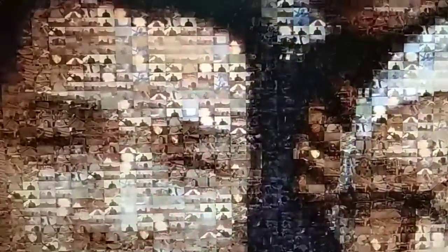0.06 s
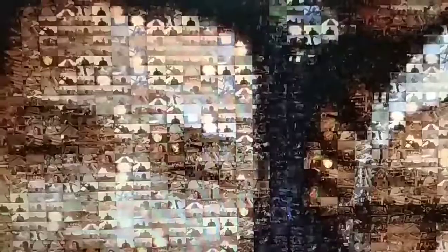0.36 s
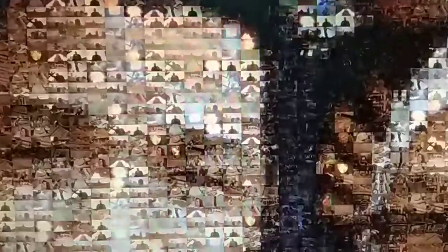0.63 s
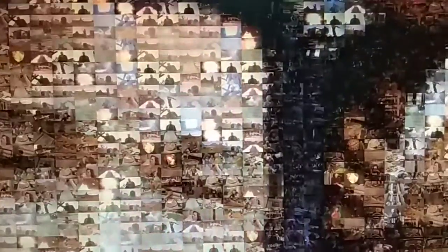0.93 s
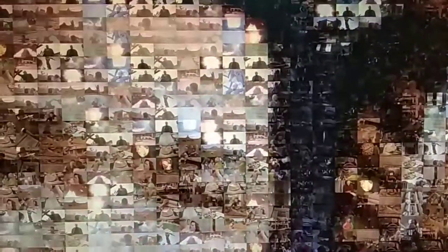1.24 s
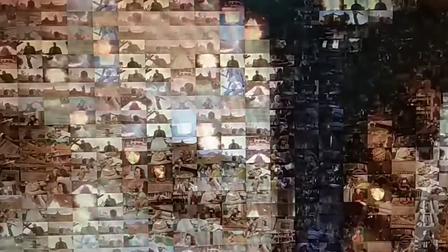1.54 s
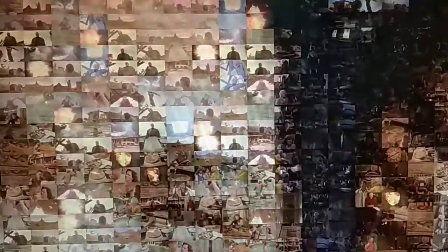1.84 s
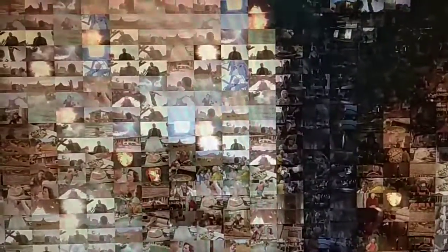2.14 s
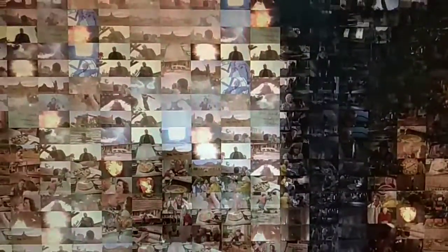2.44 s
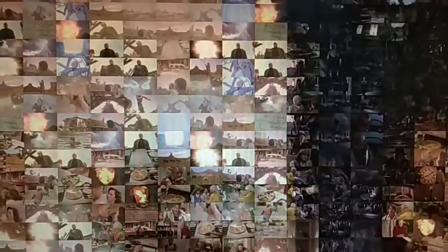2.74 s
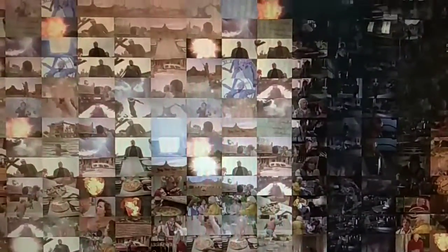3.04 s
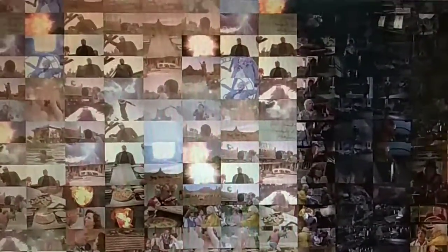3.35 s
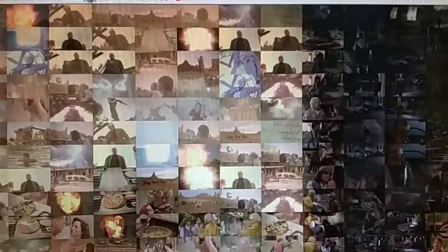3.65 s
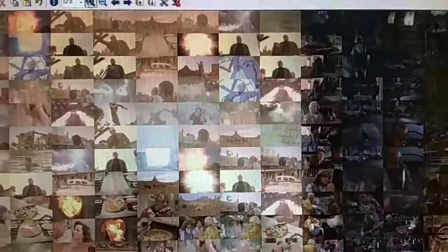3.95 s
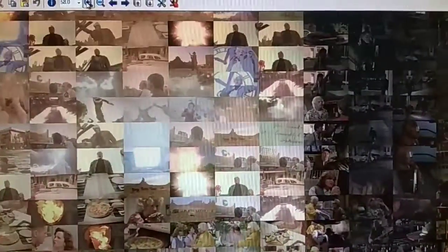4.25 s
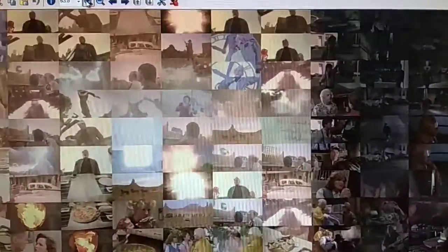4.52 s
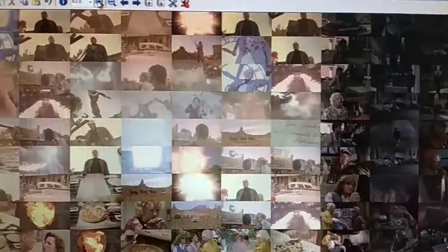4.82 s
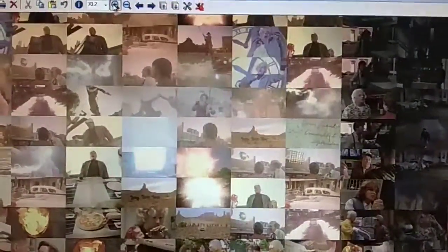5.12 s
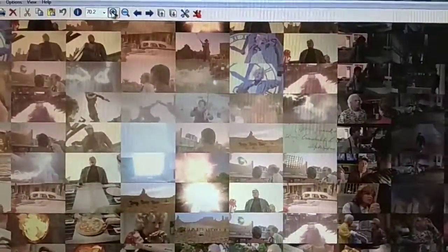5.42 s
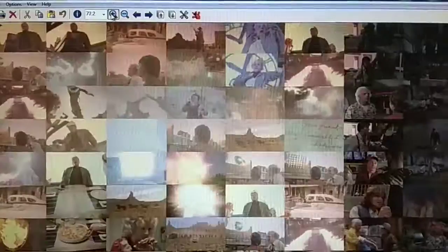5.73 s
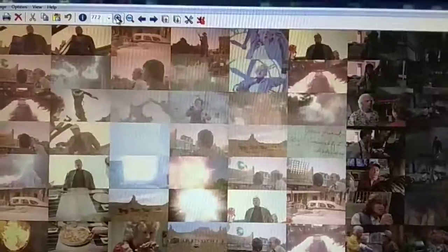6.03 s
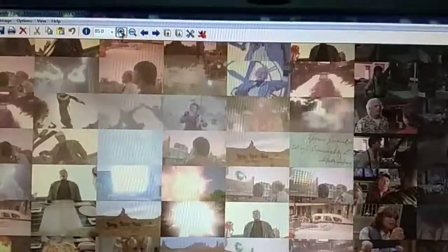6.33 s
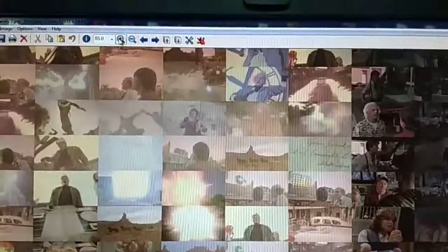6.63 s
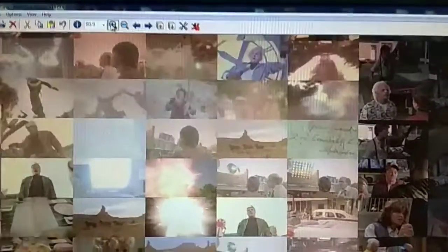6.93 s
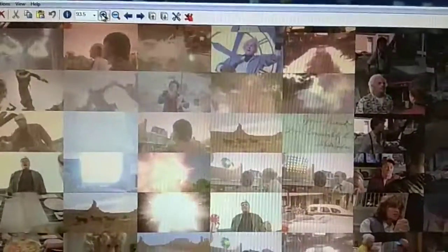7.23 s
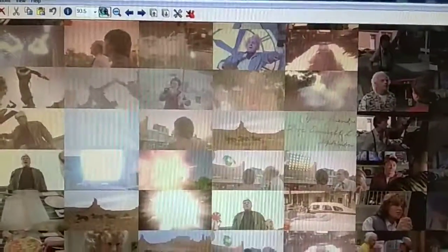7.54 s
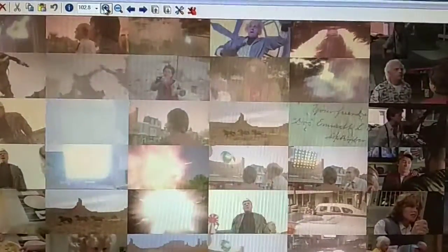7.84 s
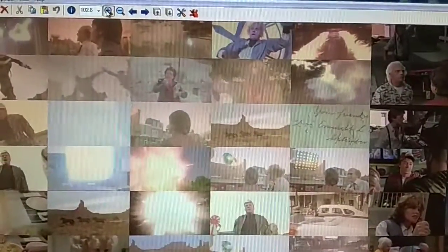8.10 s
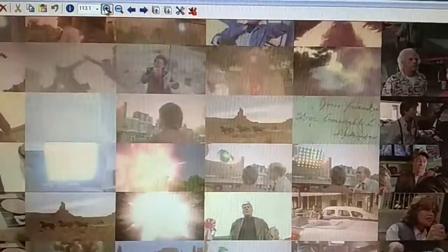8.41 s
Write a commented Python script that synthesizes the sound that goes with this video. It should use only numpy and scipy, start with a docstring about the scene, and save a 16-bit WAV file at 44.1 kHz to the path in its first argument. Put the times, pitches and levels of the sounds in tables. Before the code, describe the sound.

A mouse scroll wheel clicks notch by notch, gradually slowing, over a low draught rumble on the microphone and a steady computer hum.

```python
"""At a desk in a small room, a mouse wheel is turned notch by notch close to a hand-held microphone.
Each notch snaps a spring against the plastic shell, whose modes ring and echo in the room.
A draught buffets the right microphone port: its turbulent pressure makes a low, lumpy rumble.
Behind them a computer hums, whirs and buzzes faintly, with soft chirps just above the microphone's hiss."""
import sys
import numpy as np
from scipy import signal
from scipy.fft import rfft, irfft, next_fast_len
from scipy.io import wavfile
from scipy.ndimage import uniform_filter1d

SR = 44100
rng = np.random.default_rng(int(sys.argv[2]) if len(sys.argv) > 2 else 0)


def materialize(psi):
    """Save the field psi as 16-bit PCM at rate SR to the path in sys.argv[1].

    A 1-D psi becomes a single channel; in a 2-D psi each row is a channel.
    """
    bounded = np.clip(np.atleast_2d(psi).T, -1, 1)
    quanta = np.round(bounded * 32767).astype(np.int16)
    wavfile.write(sys.argv[1], SR, quanta)


N = 377919


def wheel(direct_db=1.07, echo_db=-6.0):
    """Repeated impacts: soft and hard notches alternate, each kind rebounding much alike every time."""
    # wheel notches: (time [s], relative level [dB], extra treble [dB], extra body [dB],
    # rattle decay time at 11 kHz [s])
    notches = [(0.1118, -47.5, 3, 2, 0.0026), (0.2744, -48, 0, 1.5, 0.0023),
               (0.431, -46.5, 2, -2.0, 0.0023), (0.6041, -48, 0.0, 0, 0.002), (0.7517, -48, 6.5, 2, 0.0021),
               (0.9282, -47.5, 1, -0.5, 0.0019), (1.0786, -48.5, 4, 3, 0.003), (1.2683, -48, 0, 1, 0.0023),
               (1.4279, -47.0, 2, 1.0, 0.0034), (1.5963, -48.5, 1, 0, 0.0022),
               (1.7508, -48.5, 4, 3, 0.0024), (1.9566, -48.5, 2, 1, 0.0021),
               (2.0999, -47.5, 2, -1.5, 0.0021), (2.3216, -48.5, 1, 0.5, 0.0017),
               (2.4776, -48, 3, -1, 0.0024), (2.6683, -48.5, 1, 0.0, 0.0015),
               (2.8209, -47.5, 0.0, 3.5, 0.0021), (3.0079, -48, 0.5, 2.0, 0.0018),
               (3.1823, -47, 2, -1.0, 0.0025), (3.4165, -49, 2, 1, 0.0014), (3.5743, -48.5, 3, 1, 0.0027),
               (3.7958, -48.5, 2, 3, 0.0023), (3.9747, -48.5, 2, 0, 0.0028),
               (4.2876, -47.5, 0.5, -0.5, 0.0028), (4.4745, -48.0, 1.0, 4.5, 0.0022),
               (4.821, -48, 4, -1.0, 0.002), (5.0246, -48, 3, 1, 0.0027), (5.4405, -48.5, 2, 2, 0.0022),
               (5.6433, -48.5, 6, 1, 0.0016), (6.0637, -49.5, 4, 1.5, 0.0024), (6.2505, -48, 3, 4, 0.002),
               (6.6832, -48.0, 1.0, 2, 0.001), (6.8683, -48, 2, 0, 0.002), (7.319, -48.0, 1.5, 0.5, 0.0018),
               (7.5055, -47.5, 1.0, 0.5, 0.0017), (8.0318, -48, 1.5, 2, 0.0019),
               (8.2521, -48, 4, -2, 0.0024)]
    # modes of wheel and shell: (frequency [Hz], bandwidth [Hz], then relative levels:
    # soft notch left [dB], soft notch right [dB], hard notch left [dB], hard notch right [dB])
    modes = [(2400, 400, -38.5, -30.0, -32.0, -30.0), (2900, 250, -21.0, -29.5, -24.0, -31.5),
             (3400, 400, -26.5, -26.5, -26.5, -30.0), (5000, 700, -38.5, -34.5, -22.0, -24.0),
             (6050, 500, -23.0, -21.5, -29.5, -26.0), (7150, 300, -15.5, -20.0, -25.0, -32.0),
             (7620, 220, -10.8, -18.5, -17.3, -22.0), (8200, 260, -14.0, -16.0, -22.5, -23.5),
             (9350, 240, -22.5, -24.5, -14.0, -17.5), (9950, 220, -14.5, -25.5, -14.5, -35.0),
             (10400, 300, -11.5, -20.0, -16.5, -25.5), (11130, 220, -10.0, -20.0, -14.5, -18.0),
             (11530, 200, -13.0, -14.5, -9.0, -15.0), (12600, 260, -7.5, -17.5, -11.5, -22.5),
             (13380, 220, -18.5, -18.0, -41.5, -20.0), (13800, 200, -29.5, -23.5, -12.5, -21.5),
             (14550, 200, -9.0, -21.0, -7.0, -18.0), (14970, 200, -17.5, -27.0, -9.0, -19.5),
             (15560, 200, -19.5, -27.0, -21.0, -26.0)]
    rebound_patterns = rng.standard_normal((2, len(modes), 2, 1024))   # kind, mode, port, sample
    reflection_patterns = rng.standard_normal((2, 2, 16384))   # kind, port, sample
    out = np.zeros((2, N))
    for k, (time_s, db, treble_db, body_db, rattle_s) in enumerate(notches):
        hard = k % 2
        rebounds = varied(rebound_patterns[hard], fresh_share=0.4)
        click = spring_snap(modes, rebounds, hard, treble_db, body_db, rattle_s)
        add(out, time_s, click * from_db(db + direct_db))
        reflections = bunched(varied(reflection_patterns[hard], fresh_share=0.8))
        add(out, time_s, room_echo(reflections) * from_db(db + echo_db))
    return out


def spring_snap(modes, rebounds, hard, treble_db, body_db, rattle_s, rise_s=0.0002, impact=2.7):
    """Modal ringing: the spring's impact and rattle drive the shell, which radiates unevenly."""
    t = np.arange(rebounds.shape[-1]) / SR
    out = np.zeros(rebounds.shape[1:])
    top_db = treble_db + (-0.5 if hard else -2.5)
    for k, (hz, width_hz, *levels_db) in enumerate(modes):
        # the rebounds get softer, so they stop driving the high modes first
        decay = np.exp(-t / rattle_s * np.sqrt(hz / 11000))
        force = rebounds[k] * (1 - np.exp(-t / rise_s)) * decay
        force[:, round(rise_s * SR)] += impact * (-1) ** k
        # the finger's grip shifts each mode a little in pitch and level
        detune, grip_db = rng.normal(0, 0.005), rng.normal(0, 1.0)
        ringing = resonance(force, hz * (1 + detune), width_hz)
        ports_db = np.reshape(levels_db, (2, 2, 1))[hard]
        colour_db = (body_db - 0.1) * (hz < 6500) + top_db * (hz > 12000)
        out += from_db(ports_db + colour_db + grip_db) * ringing / ringing.std(axis=1, keepdims=True)
    return out


def room_echo(reflections, room_t60_s=0.35, air_hz=12000, air_t60_s=0.24):
    """Reverberation: early reflections from desk and screen, and a diffuse tail whose top dies first."""
    # spectrum of the echo: (frequency [Hz], relative level [dB])
    spectrum = [(700, 2.5), (1500, -6), (2200, -10), (2900, 0), (4200, -9), (6000, -8.5), (8000, 0),
                (9200, -5), (11500, 6), (13000, 0), (14500, 3), (15300, -1), (16200, -22)]
    t = np.arange(reflections.shape[-1]) / SR
    decay = from_db(-60 * t / room_t60_s) * (t > 0.002)
    early_cluster = 0.32 * bell(t - 0.014, width_s=0.0025)
    tail = coloured(reflections, spectrum)
    dull = signal.sosfiltfilt(signal.butter(4, air_hz, fs=SR, output="sos"), tail)
    top = (tail - dull) * from_db(-60 * t / air_t60_s)
    return (dull + top) * (decay + early_cluster)


def bunched(reflections, spacing_s=0.003, spread_db=2.5):
    """Amplitude modulation: reflections arrive in stronger and weaker bunches."""
    t = np.arange(reflections.shape[-1]) / SR
    knots = np.arange(0, t[-1], spacing_s)
    return reflections * from_db(np.interp(t, knots, rng.normal(0, spread_db, len(knots))))


def draught():
    """Turbulent pressure: slow swirls and fast eddies on the right port, soft swirl on the sheltered left."""
    # light breeze on the right port: (time [s], relative level [dB])
    breeze = [(0.0, -42), (0.85, -47), (1.2, -34), (1.7, -36.5), (2.1, -40), (2.75, -43), (3.3, -40),
              (4.9, -40), (5.65, -41), (5.85, -58), (6.25, -40), (6.45, -58), (6.9, -52.5), (7.1, -41),
              (7.35, -57), (7.72, -65), (8.15, -53), (8.57, -39)]
    # gusts on the right port: (start [s], hold [s], relative swirl level [dB], relative eddy level [dB])
    gusts = [(0.061, 0.089, -29.5, -46), (0.507, 0.069, -30, -47.5), (0.651, 0.014, -30, -43.5),
             (0.984, 0.072, -30, -42.5), (1.114, 0.039, -27, -45.5), (1.182, 0.11, -30.5, -45),
             (1.425, 0.046, -26.5, -47), (1.603, 0.04, -34, -50), (1.784, 0.038, -33, -43.5),
             (1.897, 0.085, -30, -42.5), (2.159, 0.028, -30.5, -48.5), (2.233, 0.097, -34.5, -52.5),
             (2.521, 0.052, -26.5, -49), (2.887, 0.055, -35, -51), (2.957, 0.17, -30.5, -51),
             (3.314, 0.11, -29.5, -46.5), (3.557, 0.026, -30.5, -43), (3.723, 0.014, -27, -47),
             (3.814, 0.11, -35, -53), (4.037, 0.11, -34.5, -51), (4.268, 0.015, -32, -54),
             (4.397, 0.078, -35, -56.5), (4.548, 0.014, -31.5, -48.5), (4.663, 0.24, -31, -50.5),
             (5.103, 0.066, -33.5, -51.5), (5.235, 0.025, -32.5, -67), (5.478, 0.017, -27, -61),
             (5.565, 0.11, -36.5, -66), (5.98, 0.056, -38, -58), (6.118, 0.083, -37.5, -55.5),
             (7.023, 0.021, -29, -52), (7.12, 0.11, -40, -73), (7.47, 0.12, -39, -75),
             (7.99, 0.091, -42, -82), (8.242, 0.013, -40.5, -76), (8.455, 0.099, -38, -58)]
    # swirl on the left port: (time [s], relative level [dB])
    sheltered = [(0, -47), (0.45, -40), (1.1, -42), (1.55, -44), (1.95, -45), (2.9, -44.5), (3.7, -49),
                 (3.91, -28.5), (4.04, -58), (4.25, -37), (4.5, -62), (4.85, -61), (5.1, -43),
                 (5.55, -35.5), (5.95, -51), (8.57, -53)]
    # spectra of right swirl, right eddies and left swirl: (frequency [Hz], relative level [dB])
    swirl_spectrum = [(10, -6.5), (25, 3), (45, 1.5), (70, -3.5), (100, -9.5), (140, -26.5), (250, -47.5)]
    eddy_spectrum = [(40, -8), (80, -4.5), (120, 6), (170, 4), (230, -5), (320, -15.5), (480, -28.5),
                     (900, -36), (1600, -41.5)]
    left_spectrum = [(4, -2), (12, 1), (28, -2.5), (48, -4), (80, -16), (200, -42)]
    t = np.arange(N) / SR
    breeze_db = np.interp(t, *np.transpose(breeze))
    swirl_gain, eddy_gain = from_db(breeze_db + 4.5), from_db(breeze_db - 19)
    for start_s, hold_s, swirl_db, eddy_db in gusts:
        swirl_gain = np.maximum(swirl_gain, from_db(swirl_db + 3.5) * gust(start_s, hold_s, 0.024))
        eddy_gain = np.maximum(eddy_gain, from_db(eddy_db + 6) * gust(start_s, hold_s, 0.0091))
    swirl = swirl_gain * turbulence(swirl_spectrum, even_s=0.0935)
    eddies = eddy_gain * turbulence(eddy_spectrum, even_s=0.098)
    left_gain = from_db(np.interp(t, *np.transpose(sheltered)) - 4)
    return np.array([left_gain * turbulence(left_spectrum, even_s=0.13), swirl + eddies])


def gust(start_s, hold_s, release_s, attack_s=0.012):
    """Exponential growth and decay: a gust builds to 1 at start_s, holds, then dies away."""
    t = np.arange(N) / SR
    rise, fall = (t - start_s) / attack_s, (start_s + hold_s - t) / release_s
    return np.exp(np.clip(np.minimum(rise, fall), -20, 0))


def turbulence(spectrum, even_s):
    """Random pressure fluctuation: coloured noise of even strength."""
    return evened(coloured(rng.standard_normal(N), spectrum), even_s)


def puffs(suction_stretch=3.8, size=4096):
    """Pressure pulses thump the right port: each is a brief push inside a longer, weaker suction."""
    # hardest puffs of the draught: (time [s], peak level [dB], width of the push [s])
    pulses = [(0.074, -21, 0.0013), (0.552, -16.5, 0.0016), (0.99, -23, 0.001), (1.016, -28, 0.0015),
              (1.127, -11.5, 0.0016), (1.184, -31, 0.0017), (1.197, -35, 0.0012), (1.39, -25, 0.0014),
              (2.25, -19, 0.0027), (1.244, -14.5, 0.002), (1.254, -29, 0.00041), (1.419, -23, 0.0015),
              (1.457, -20, 0.0012), (1.62, -21, 0.0019), (1.797, -21.5, 0.00095), (1.901, -15.5, 0.0017),
              (1.918, -15.5, 0.00082), (2.164, -14.5, 0.0029), (2.524, -19, 0.0012), (2.547, -23, 0.0011),
              (2.566, -22, 0.00078), (2.895, -18.5, 0.0014), (2.907, -17, 0.0026), (2.922, -29, 0.001),
              (2.962, -18.5, 0.0014), (3.02, -30, 0.0017), (3.121, -15, 0.001), (3.348, -21.5, 0.0011),
              (3.394, -20.5, 0.00087), (3.421, -17.5, 0.0038), (3.515, -21, 0.0029), (3.724, -17, 0.0027),
              (4.044, -23.5, 0.0018), (4.067, -25, 0.0017), (4.172, -21, 0.003), (4.409, -21.5, 0.0026),
              (4.667, -24, 0.0025), (4.681, -16.5, 0.0024), (4.737, -30, 0.0011), (4.857, -20.5, 0.0018),
              (4.967, -19.5, 0.0017), (5.476, -18.5, 0.0015), (5.647, -28, 0.0018), (6.007, -26, 0.0023),
              (7.036, -21.5, 0.00087), (7.058, -23, 0.0014), (7.205, -23, 0.0034), (8.538, -16.5, 0.0028)]
    out = np.zeros((2, N))
    around = (np.arange(size) - size / 2) / SR
    for time_s, db, width_s in pulses:
        suction = bell(around - width_s, width_s * suction_stretch) / suction_stretch
        pressure = bell(around, width_s) - suction
        add(out[1], time_s + around[0], from_db(db) * pressure / pressure.max())
    return out


def hum(waver_db=0.53, waver_rad=0.014, step=6):
    """Standing waves give each slightly wavering tone its own level and phase at the two ports."""
    # mains hum and fan tones: (frequency [Hz], left level [dB], right level [dB], left phase lead [rad])
    tones = [(100, -50, -50, 0.2), (110, -56, -55, 0.0), (120, -63, -63, -0.3), (200, -74, -77, -0.4),
             (290, -77, -76, -0.6), (300, -65, -65, 0.4), (310, -71, -72, -0.4), (320, -74, -73, -0.2),
             (330, -74, -74, -0.4), (340, -79, -75, -0.4), (345, -77, -78, -0.2), (365, -70, -72, 0.3),
             (400, -72, -72, -0.6), (410, -71, -71, -0.8), (490, -80, -76, -0.1), (500, -72, -81, -0.8),
             (510, -76, -72, 0.2), (590, -83, -84, -0.5), (600, -67.3, -65.3, -0.3), (610, -79, -78, 0.3),
             (620, -81, -84, 0.2), (700, -70.5, -82, -3.1), (799, -93, -86, -0.9),
             (899, -80.2, -77.2, -1.8), (1095, -84, -85, 0.7), (1199, -85, -85, 3.1),
             (1298, -97, -87, -2.0), (1399, -78.7, -81.5, 1.3), (1599, -78, -92, 2.6),
             (1798, -89, -85, -1.8), (2198, -86, -94, -0.2)]
    # change from start to end as the microphone drifts through the standing waves:
    # {frequency [Hz]: (left change [dB], right change [dB])}
    drift = {700: (-1.5, 9), 1399: (9, 0)}
    t = np.arange(N // step + 1) * step / SR   # low tones need only a coarse time grid
    knots = np.linspace(0, N / SR, 18)
    out = np.zeros((2, len(t)))
    for hz, left_db, right_db, lead in tones:
        swell, slip = rng.standard_normal((2, len(knots)))
        phase = 2 * np.pi * (hz * t + rng.random()) + np.interp(t, knots, waver_rad * slip)
        waver = np.interp(t, knots, from_db(waver_db * swell))
        drift_gain = from_db(np.outer(drift.get(hz, (0, 0)), t / t[-1] - 0.5))
        ports = np.array([from_db(left_db) * np.sin(phase + lead), from_db(right_db) * np.sin(phase)])
        out += np.sqrt(2) * waver * drift_gain * ports
    return signal.resample_poly(out, step, 1, axis=1, window=("kaiser", 9))[:, :N]


def fan(rush_db=-53.5, direct_db=-66.5, left_lag_s=0.00045):
    """Flow noise: a low rush common to both ports, and a brighter part that reaches the right one first."""
    # spectra of the low rush and the direct sound: (frequency [Hz], relative level [dB])
    rush_spectrum = [(15, 13), (40, -8), (80, -2), (160, -11), (260, -8.5), (345, -6.5), (430, -19.5),
                     (530, -12.5), (660, -25.5), (850, -38), (1500, -48)]
    direct_spectrum = [(100, 6.5), (500, 12), (1200, 6.5), (3000, -4.5), (5600, -12), (10000, -7.5),
                       (13000, -20)]
    direct = from_db(direct_db) * coloured(rng.standard_normal(N), direct_spectrum)
    rush = from_db(rush_db) * stereo_noise(rush_spectrum, correlation=1.0)
    return rush + np.array([np.roll(direct, round(left_lag_s * SR)), direct])


def buzz(tick_hz=99.95, burst_s=0.00032, edge=0.96):
    """Periodic excitation: a tiny electric tick twice in each mains cycle rings a few high resonances."""
    # resonances of the buzz: (frequency [Hz], bandwidth per stage [Hz], left level [dB], right level [dB])
    resonances = [(5930, 330, -79, -74), (6590, 260, -80.5, -77.5), (9240, 1300, -79.5, -77.5)]
    since_tick = (np.arange(N) / SR) % (1 / tick_hz)
    ticks = np.exp(-since_tick / burst_s) * rng.standard_normal((2, N)) + edge * (since_tick < 1 / SR)
    return sum(from_db([[left_db], [right_db]]) * narrow_band(ticks, hz, width_hz, even_s=0.011)
               for hz, width_hz, left_db, right_db in resonances)


def chirps(gain_db=-0.2, size=8192):
    """Narrow-band noise is heard as pitch: soft chirps swell and fade just above the hiss."""
    # faint chirps: (time [s], frequency [Hz], relative level [dB])
    events = [(0.151, 1780, -71), (0.5, 3560, -69), (0.87, 2080, -73), (1.58, 2420, -69.5),
              (2.29, 2240, -68), (2.66, 1510, -70), (3.38, 2120, -71), (3.73, 2270, -71), (4.08, 2250, -69),
              (4.439, 3000, -65.5), (4.79, 2100, -70), (5.169, 1700, -71), (5.511, 2630, -66.5),
              (6.59, 1880, -70), (7.31, 2460, -71), (7.65, 1860, -71), (8.02, 1850, -69.5)]
    out = np.zeros((2, N))
    around = (np.arange(size) - size / 2) / SR
    for time_s, hz, db in events:
        tone = narrow_band(rng.standard_normal(size), hz, width_hz=240, even_s=0.047)
        add(out, time_s + around[0], from_db(db + gain_db) * tone * bell(around, width_s=0.023))
    return out


def hiss(level_db=-64.5):
    """Self-noise of the microphone, almost uncorrelated between the ports."""
    # spectrum of the hiss: (frequency [Hz], relative level [dB])
    spectrum = [(300, 9), (800, 5), (1500, 5), (2300, 2.5), (3300, 0), (4500, 0), (5200, 4), (5600, -4),
                (6500, 4), (8000, -5), (9800, 0), (12000, -0.5), (13500, -4.5), (15000, -37)]
    return from_db(level_db) * stereo_noise(spectrum, correlation=0.015)


def from_db(db):
    """Decibels to amplitude ratio."""
    return 10 ** (np.asarray(db) / 20)


def unit_rms(x):
    """Normalisation to an rms of 1."""
    return x / np.sqrt(np.mean(x ** 2) + 1e-20)


def evened(x, span_s):
    """Division by the running rms holds the strength near 1."""
    return x / np.sqrt(uniform_filter1d(x ** 2, int(span_s * SR)) + 1e-6)


def bell(t, width_s):
    """Gaussian pulse with a peak of 1 at t = 0."""
    return np.exp(-0.5 * (t / width_s) ** 2)


def coloured(x, spectrum):
    """Spectral shaping by (frequency [Hz], level [dB]) points, rolled off above the last; rms 1."""
    hz, db = np.transpose(spectrum)
    size = next_fast_len(x.shape[-1])
    bins = np.maximum(np.arange(size // 2 + 1) * SR / size, 1)
    gain = from_db(np.interp(np.log(bins), np.log(hz), db)) / np.hypot(1, bins / hz[-1] / 2 * bins / hz[-1] / 2)
    return unit_rms(irfft(rfft(x, size) * gain, size)[..., :x.shape[-1]])


def resonance(x, hz, width_hz):
    """Damped oscillator: a two-pole resonance with a peak gain of 1."""
    radius = np.exp(-np.pi * width_hz / SR)
    feedback = [1, -2 * radius * np.cos(2 * np.pi * hz / SR), radius ** 2]
    return signal.lfilter(np.array([1, 0, -1]) * (1 - radius ** 2) / 2, feedback, x + 1e-18)


def narrow_band(x, hz, width_hz, even_s):
    """Two resonances in cascade pass a narrow band, which is then evened in strength."""
    band = resonance(resonance(x, hz, width_hz), hz, width_hz)
    return evened(unit_rms(band), even_s)


def stereo_noise(spectrum, correlation):
    """Partial coherence: coloured noise mixed from parts in phase and in antiphase at the two ports."""
    mid, side = coloured(rng.standard_normal((2, N)), spectrum)
    return unit_rms(np.sqrt(1 + correlation) * mid + np.sqrt(1 - correlation) * np.array([side, -side]))


def varied(pattern, fresh_share):
    """Uncorrelated powers add: a share of the pattern's power is replaced by new noise."""
    return np.sqrt(1 - fresh_share) * pattern + np.sqrt(fresh_share) * rng.standard_normal(pattern.shape)


def add(out, time_s, sound):
    """Superposition: mix a sound in from time_s on."""
    start = max(round(time_s * SR), 0)
    out[..., start:start + sound.shape[-1]] += sound[..., :N - start]


def scene():
    """Sound pressures add: the wheel in its room, over computer, draught, chirps and hiss."""
    return wheel() + hum() + fan() + buzz() + draught() + puffs() + chirps() + hiss()


def record(dry, cutoff_hz=16400):
    """Band limiting: a steep low-pass filter cuts the top treble."""
    return signal.sosfilt(signal.ellip(10, 0.2, 80, cutoff_hz, fs=SR, output="sos"), dry)


dry = scene()
out = record(dry)
materialize(out)
```